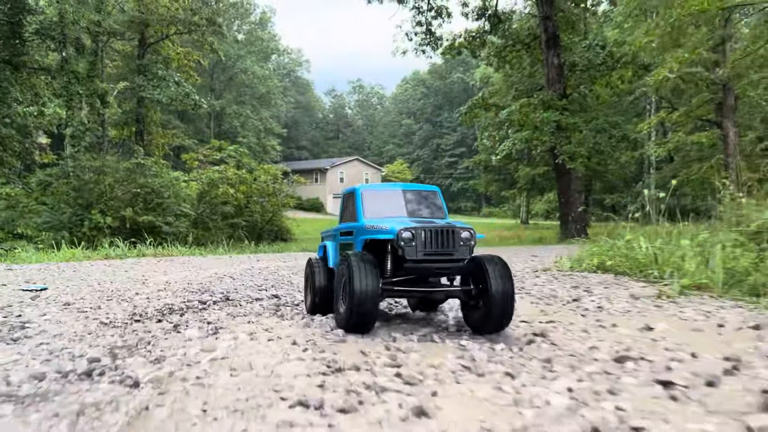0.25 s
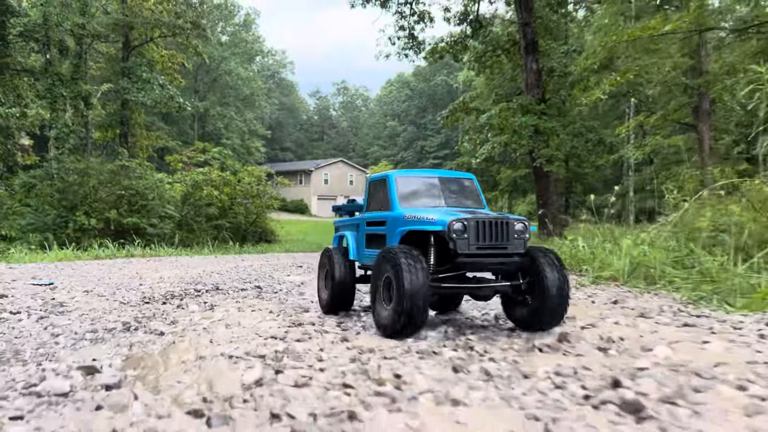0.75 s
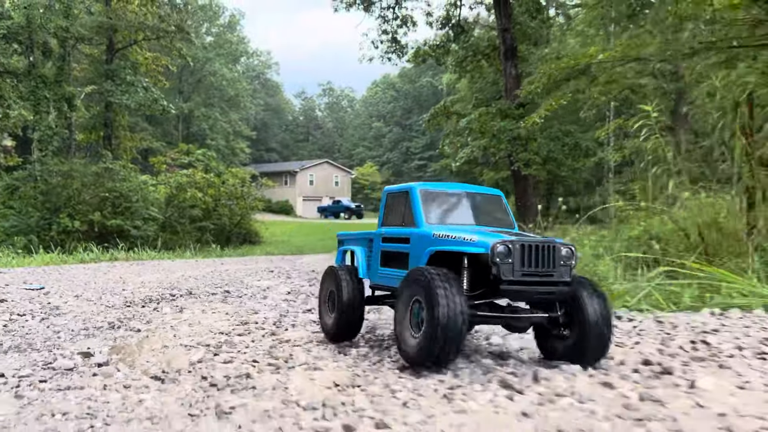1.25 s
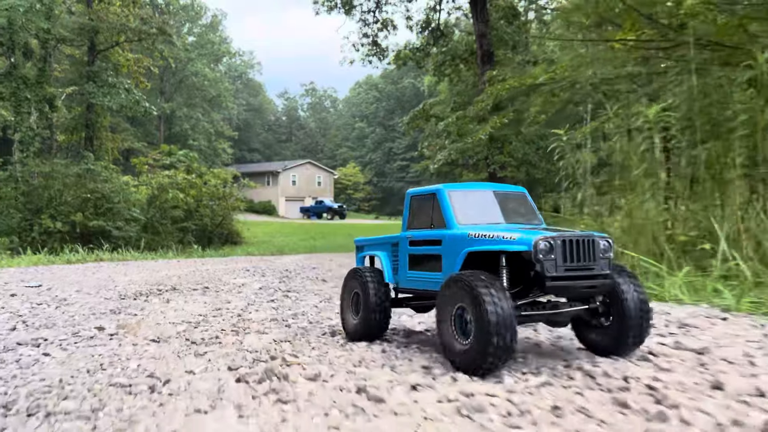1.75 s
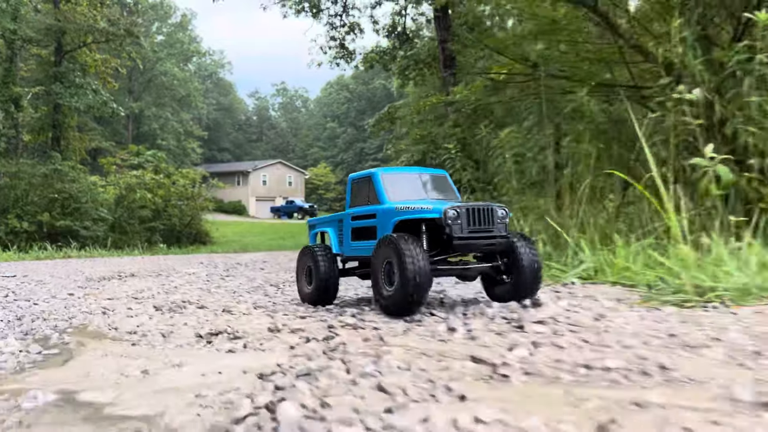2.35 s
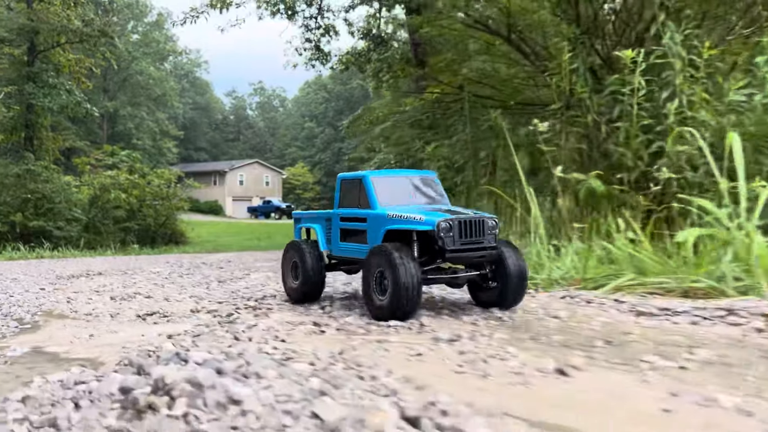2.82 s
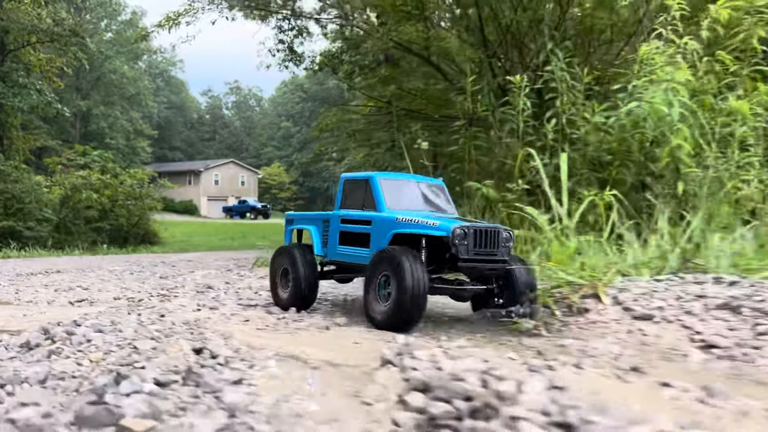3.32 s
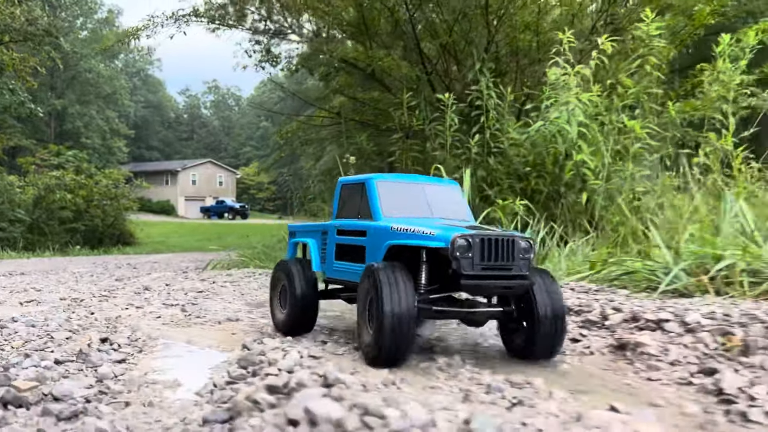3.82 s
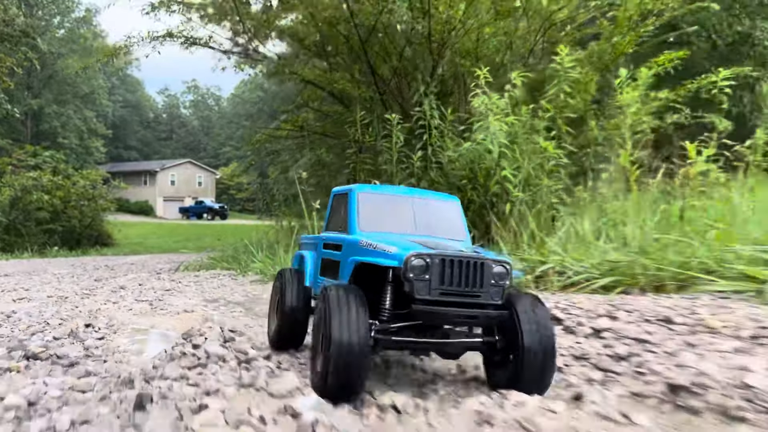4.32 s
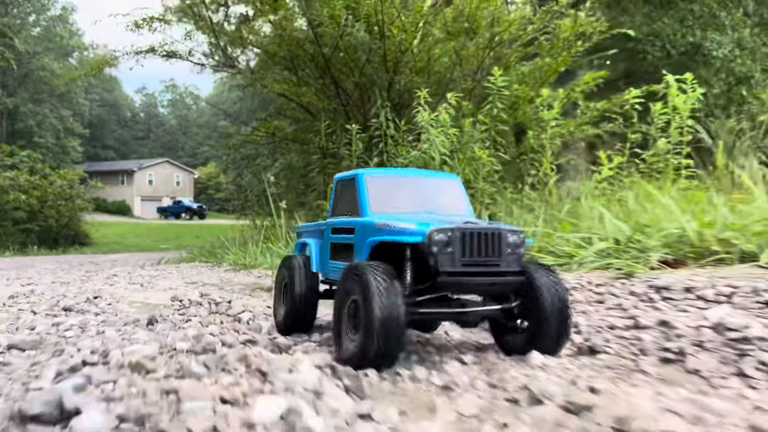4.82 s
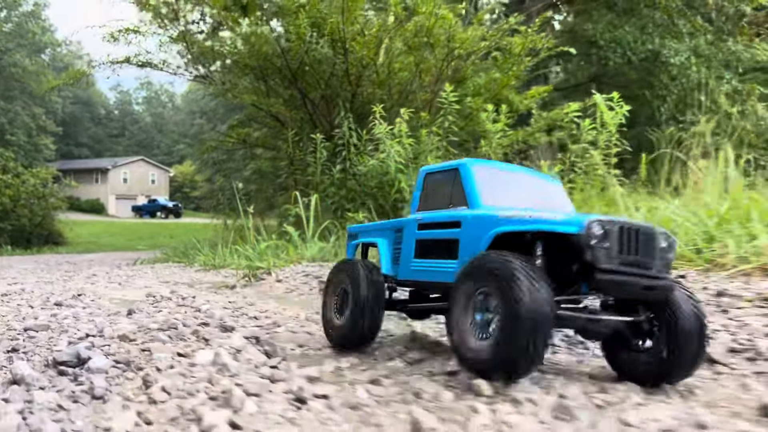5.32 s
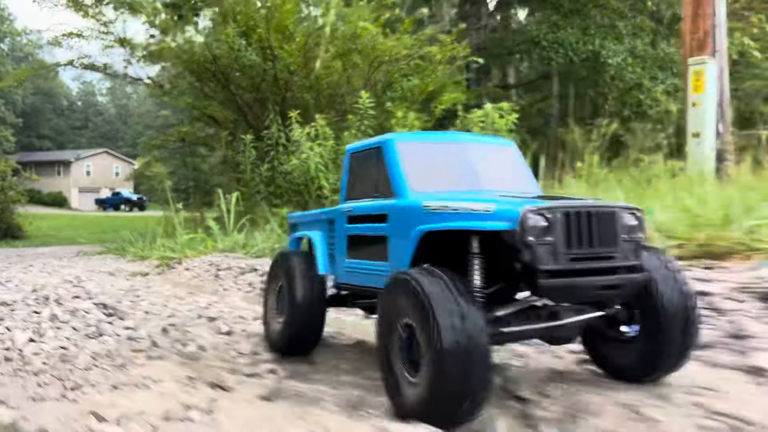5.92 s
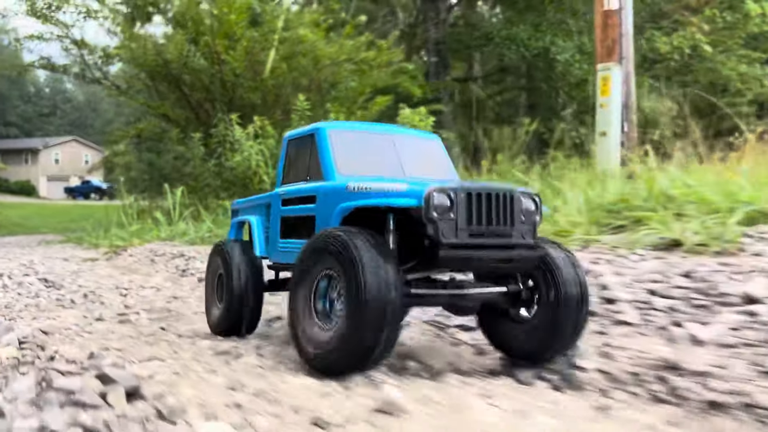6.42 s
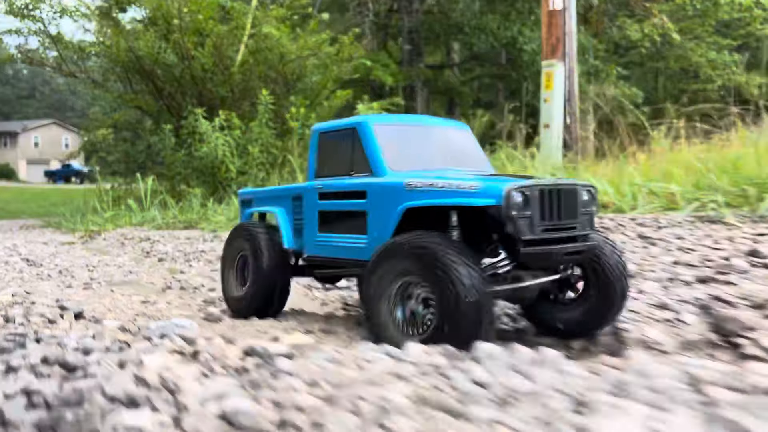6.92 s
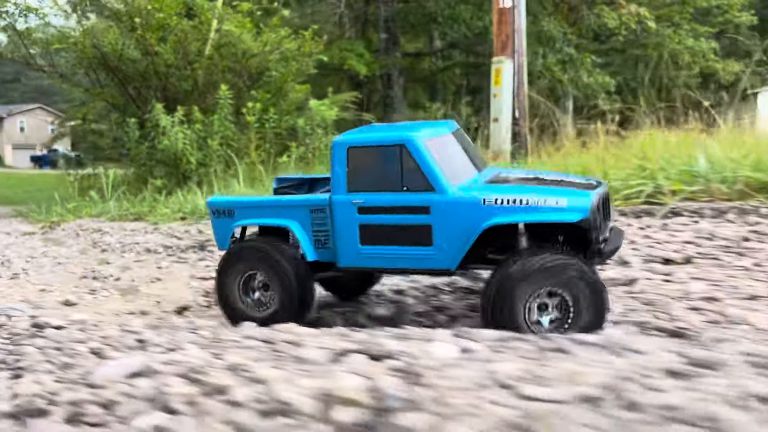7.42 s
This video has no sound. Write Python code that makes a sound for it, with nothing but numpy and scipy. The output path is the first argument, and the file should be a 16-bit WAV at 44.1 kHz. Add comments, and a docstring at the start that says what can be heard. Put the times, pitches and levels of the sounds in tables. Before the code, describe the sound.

Continuous gritty rush of gravel under small rubber tyres, with a low rough electric buzz and breathy gear hum, swelling unevenly as the toy approaches.

```python
"""Tyres of a small electric toy truck crush loose gravel outdoors: a dense rush of stone grains,
made of noise and short pulses, that grows brighter as the truck crawls nearer.
A buzz of 50 a second, summed from locked partials, runs through it; the rush throbs eight times
a buzz period. Behind: a breathy gear hum of band noise and two soft low thuds of decaying sine."""
import sys
import numpy as np
from scipy import signal
from scipy.fft import rfft, irfft, next_fast_len
from scipy.io import wavfile
from scipy.ndimage import uniform_filter1d, map_coordinates

SR = 44100
rng = np.random.default_rng(int(sys.argv[2]) if len(sys.argv) > 2 else 0)


def makeup_ratio(level_db):
    """Linear amplitude ratio for a level in decibels (20 dB per factor of ten)."""
    decades = np.asarray(level_db, float) / 20
    return 10 ** decades


def master(y):
    """Save y as 16-bit WAV."""
    cut = np.clip(np.atleast_2d(y).T, -1, 1)
    pcm = np.round(cut * 32767)  # scale
    wavfile.write(sys.argv[1], SR, pcm.astype(np.int16))


N = 337708  # samples
BUZZ_HZ, BITE_S = 50, 0.275


# evenness of deep, rumble, grind, rasp, crunch, hiss: (firmness [0-1])
EVENNESS = [.05, 0.1, 0.37, .3, 0.3, 0.31]


def rush(levels_db):
    """Crushed gravel in six frequency parts, each evened and set to its own moving level."""
    parts = zip(levels_db, layers(gravel()), EVENNESS)
    return sum(makeup_ratio(db) * evened(part, firmness) for db, part, firmness in parts)


# left-right likeness of the stones: (frequency [Hz], correlation [-1 to 1])
LIKENESS = [(60, 0.16), (150, 0.12), (500, 0.23), (2000, 0.055), (9000, 0.083)]


def gravel():
    """Throbbing grains plus buzz ticks, coloured; the two channels are mostly unrelated."""
    pair = grains(per_second=2500, share=0.4) * throb(depth_db=1.2) + buzz_ticks()

    def turn_rad(hz):
        return np.arcsin(np.clip(along(LIKENESS, hz), -1, 1)) / 2

    own = filtered(pair, lambda hz: colour(hz) * np.cos(turn_rad(hz)))
    shared = filtered(pair[::-1], lambda hz: colour(hz) * np.sin(turn_rad(hz)))
    return calmed(own + shared)


def grains(per_second, share):
    """Stones snap as short suction pulses over a noise bed of countless far ones; share is of power."""
    struck = rng.random((2, N)) < per_second / SR
    snaps = rng.uniform(0.5, 1.5, (2, N)) * struck
    bed = rng.standard_normal((2, N))
    return np.sqrt(1 - share) * bed - np.sqrt(share) * unit(snaps - snaps.mean())


# the eight throbs of one buzz period: (strength [dB])
THROB_DB = [-0.7, 0.38, 0.5, 0.92, 1.3, 1, 0.51, -0.54]


def throb(depth_db):
    """Loudness beats eight times a buzz period, each beat at its own strength."""
    count = len(THROB_DB)
    beat = np.arange(N) / SR * BUZZ_HZ * count
    strength_db = np.interp(beat % count, np.arange(count) + 0.5, THROB_DB, period=count)
    return makeup_ratio(strength_db - depth_db * np.cos(2 * np.pi * beat))


# buzz ticks: (place in the throb [0-1], push scale [amplitude, minus = pull])
BUZZ_TICKS = [(.015, -1.8), (.265, 2.0), (.36, -1.6), (.445, 2.0), (.505, -1.9), (.61, -1.8), (.69, -1.5),
              (.77, -2.8)]


def buzz_ticks():
    """Short ticks sit at fixed places in every throb of the buzz; random zero-mean force, some sharp."""
    place, push = np.transpose(BUZZ_TICKS)
    throb_s = 1 / (BUZZ_HZ * len(THROB_DB))
    starts = np.arange(int(N / SR / throb_s))[:, None]
    at = np.round((starts + place) * throb_s * SR).astype(int)
    force = np.minimum(rng.exponential(1, (2, *at.shape)), 3.5) - 0.97  # 0.97: mean of the capped draw
    train = np.zeros((2, N + 1))
    train[:, at] = push * force
    return train[:, :N]


# stone spectrum: (frequency [Hz], relative density [dB per Hz])
STONE_SPECTRUM = [(15, -49.5), (25, -29), (60, -22.5), (110, -14), (260, -4), (520, -6), (900, -0.5),
                  (1550, -2.5), (2300, -3.5), (3320, -7.5), (5530, -18.5), (6950, -31), (7800, -44),
                  (9680, -57.5), (12000, -91.5)]
# resonances of the hollow plastic shell: (frequency [Hz], width [Hz], lift [dB])
SHELL = [(50, 14, 7), (422.6, 17, 5.5), (444, 31, 2.5), (471, 16, 2.5), (608, 45, 4.5), (844, 55, 1.5),
         (1020, 26, 0.5), (1206, 59, 5), (1417, 90, 1.5), (1730, 90, 2.5), (2020, 380, 2.5), (2770, 82, 2),
         (3210, 79, 2), (4930, 200, 1.5), (5800, 75, 2.5)]
# sag at buzz multiples, equal rise halfway between: (frequency [Hz], depth [dB])
RIPPLE = [(60, 0), (200, 0.5), (500, 0.1), (1500, 1), (5000, 1)]


def colour(hz):
    """Stone spectrum, lifted where the shell rings, rippled in step with the buzz."""
    shell_db = sum(db / (1 + (2 * (hz - centre) / width) ** 2) for centre, width, db in SHELL)
    ripple_db = along(RIPPLE, hz) * np.cos(2 * np.pi * hz / BUZZ_HZ)
    return makeup_ratio(along(STONE_SPECTRUM, hz) + shell_db - ripple_db)


# levelling of narrow blotches of pitch: (frequency [Hz], firmness [0-1])
CALM = [(250, 0.2), (800, 0.4), (1500, 0.14), (4000, 0.22)]


def calmed(x):
    """Brief narrow swells and gaps are pressed towards the mean power of their frequency bin."""
    hz, _, z = signal.stft(x, SR, nperseg=512)
    power = np.abs(z) ** 2
    ratio = uniform_filter1d(power, size=3, axis=2) / power.mean(axis=2, keepdims=True)
    firmness = np.clip(along(CALM, hz), 0, 1)[:, None]
    gain = (np.abs(ratio) + 0.05) ** (-firmness / 2)
    return signal.istft(z * gain, SR, nperseg=512)[1][:, :N]


def evened(part, firmness, hold_s=0.015):
    """The crush is more even than chance: short swells are pressed down, short gaps filled."""
    span = round(hold_s * SR)
    power = np.abs(uniform_filter1d(uniform_filter1d(part ** 2, span), span))
    return unit(part * (power / power.mean() + 1e-3) ** (-np.clip(firmness, 0, 1) / 2))


# splits between deep | rumble | grind | rasp | crunch | hiss: (frequency [Hz])
SPLIT_HZ = [140, 346, 720, 1497, 3940]


def layers(x):
    """Parts from low to high, with soft edges, that add up to x."""
    lows = [filtered(x, lambda f: 1 / (1 + (f / hz) ** 6.0)) for hz in SPLIT_HZ]
    return np.diff([0 * x] + lows + [x], axis=0)


# The next three have one row per part, deep to hiss.
# (base level [dB], per nearness [dB/dB], per load [dB/dB], per surge [dB/dB])
PARTS = [(-59, -0.3, 2, 0), (-50, -0.2, 2.2, 1.3), (-43.5, 0.26, 0.94, 0.36), (-40.5, 0.29, 0.5, 0.54),
         (-40.5, 0.64, -0.06, 0.72), (-45.5, 1.13, -1, 0.5)]
# change before the tyres bite: (level [dB])
THIN_DB = [-11.5, -12, -5.5, -4, -0.5, 1.5]
# shaking as the wheels bump: (level per unit of jolt [dB])
JOLT_DB = [.1, .1, .1, 0.32, 0.67, 0.71]


def part_levels_db(near_db, load_db, thin):
    """Nearness, load and surges set each part; all shake together; balance jumps at the bite."""
    jolt = np.minimum(wobble(rate=30), 0.54)  # dips freely, swells only this far
    driven_db = np.array(PARTS) @ [np.ones(N), near_db, load_db, surges()]
    return driven_db + np.outer(THIN_DB, thin) + np.outer(JOLT_DB, jolt)


# drive controls: (time [s], nearness [dB], tyre load [dB])
DRIVE = [(0, -6, 0), (.28, -7.5, 0), (.55, -8, -2), (.85, -5, -.5), (1.2, -2, 0), (1.71, -3, 0.2),
         (1.76, -6, -2), (1.98, -4, -1.5), (2.1, -2, .5), (2.7, -0.5, 0.5), (3.0, -0.6, -0.5),
         (3.3, -.5, -.5), (3.55, .6, 0.5), (3.76, 0, 0), (4.0, 2, 1), (4.28, 0.5, -1.5), (4.55, 1.8, 0),
         (4.9, 1.5, 0.5), (5.33, 2, -1.5), (5.7, 3.5, 0), (6.3, 4, 0), (6.9, 3, -1.5), (7.3, 3.5, -1),
         (7.66, 5.5, -1.5)]


def drive():
    """Nearness and tyre load per sample, in straight lines between points."""
    s, *columns = np.transpose(DRIVE)
    return [np.interp(np.arange(N) / SR, s, column) for column in columns]


# a wheel rolls onto a loose heap: (time [s], surge [dB])
SURGES = [(.32, -1), (.62, -0.5), (.9, 1.5), (1.14, 2), (1.3, 0.7), (1.68, 1), (2.4, 1.5), (2.72, 4.5),
          (3.38, 1.5), (4.05, 2.5), (5.03, 3.5), (5.75, 0.5), (6.12, 1), (6.75, 2.5), (7.1, 1), (7.58, 2)]


def surges(rise_s=0.02, fall_s=0.068):
    """Each heap swells (if negative, dips) the rush quickly and lets it return more slowly (dB)."""
    s, db = np.transpose(SURGES)
    since = np.arange(N) / SR - s[:, None]
    return db @ np.exp(np.where(since < 0, since / rise_s, -since / fall_s))


# buzz level per rush level, deep to hiss: (slope [dB/dB])
BUZZ_FOLLOWS = [.3, .55, 0.7, 0.93, 0.82, 0.34]


def following_buzz(levels_db, near_db, load_db, thin):
    """The buzz swells in part with the rush, frequency part by part."""
    parts = zip(levels_db, BUZZ_FOLLOWS, layers(buzz(near_db, load_db, thin)))
    return sum(makeup_ratio(follow * (db - db.mean())) * part for db, follow, part in parts)


# strongest partials: (multiple of buzz rate [1], base level [dB rms])
STRONG_PARTIALS = [(1, -66.0), (2, -70.5), (3, -65.5), (4, -62.5), (5, -63.5), (6, -59.5), (7, -61.0),
                   (8, -52.0), (9, -60.0), (15, -55.5), (32, -59.5), (39, -58.5), (40, -58.5), (108, -70.5),
                   (110, -70.5), (120, -74.0), (128, -77.0), (136, -76.5), (138, -82.5), (141, -85.0),
                   (144, -80.0), (152, -91.5), (159, -95.5), (161, -96.5), (168, -98.5), (176, -95.0),
                   (184, -99.5), (10, -60.5), (11, -61), (14, -57), (17, -60), (18, -61), (19, -58),
                   (16, -59.5), (22, -57.5), (28, -60), (68, -64), (92, -69)]
# drifting partials: (multiple [1], per nearness [dB/dB], per load [dB/dB], wavering [dB])
DRIFTS = [(1, -0.35, .6, 1), (2, 0.5, 0.5, 0.5), (3, -0.6, -1, 2), (4, .7, 0, 2), (8, 0, -.1, 0.9),
          (14, 0, -0.5, 1.5), (15, 1, 0, 2)]


def buzz(near_db, load_db, thin):
    """Partials locked to whole multiples of 50 Hz: some strong, a faint uneven comb between."""
    order = np.arange(1, 190)
    draw = rng.random((len(order), 3))
    comb_db = -56.0 + along(STONE_SPECTRUM, order * BUZZ_HZ) + 5.1 * np.log(draw[:, 0] + 0.017)
    level = makeup_ratio(comb_db)
    strong, strong_db = np.transpose(STRONG_PARTIALS)
    level[strong.astype(int) - 1] = makeup_ratio(strong_db)
    side = makeup_ratio(2.3 * (draw[:, 1] - 0.5) * [[1], [-1]])
    cycle = np.arange(round(SR / BUZZ_HZ)) * BUZZ_HZ / SR
    sines = np.sin(2 * np.pi * (order[:, None] * cycle + draw[:, 2:]))
    waves = (level * side)[..., None] * np.sqrt(2) * sines

    def repeat(period):
        return np.take(period, np.arange(N), axis=1, mode="wrap")

    multiple, per_near, per_load, waver_db = np.transpose(DRIFTS)
    rows = np.round(multiple).astype(int) - 1
    drift_db = np.outer(per_near, near_db - near_db.mean())
    drift_db += np.outer(per_load, load_db - load_db.mean())
    drift_db += [db * wobble(rate=5.1) for db in waver_db]
    drift_db[0] += -11 * thin  # lowest partial is weaker before the bite
    others = np.delete(waves, rows, axis=1).sum(axis=1)
    drifting = sum(makeup_ratio(db) * repeat(waves[:, row]) for row, db in zip(rows, drift_db))
    return repeat(others) + drifting


def gears(crunch_db, centre_hz=680, width_hz=110):
    """Breathy gear hum: noise through one resonance, rising with the crunch as the truck nears."""
    noise = rng.standard_normal((2, N))
    hum = filtered(noise, lambda hz: 1 / (1 + (2 * (hz - centre_hz) / width_hz) ** 2))
    return makeup_ratio(-47.5 + 1.26 * (crunch_db - crunch_db.mean())) * unit(hum)


# soft low thuds: (time [s], envelope peak [dB])
THUDS = [(1.27, -59), (1.42, -54)]


def thuds(pitch_hz=46, rise_s=0.04):
    """Each thud is a few low sine cycles that swell and die."""
    s, db = np.transpose(THUDS)
    since = np.maximum(np.arange(N) / SR - s[:, None], 0)
    swell = since / rise_s * np.exp(1 - since / rise_s)
    return makeup_ratio(db) @ (swell * np.sin(2 * np.pi * pitch_hz * since))


def unit(x):
    """Scaled to rms 1."""
    return x / np.sqrt(np.mean(x ** 2) + 1e-20)


def along(points, hz):
    """(Hz, value) points read on a log axis."""
    f, v = np.transpose(points)
    return np.interp(np.log(hz + 1), np.log(f + 1), v)


def filtered(x, response):
    """x times a response of frequency."""
    m = next_fast_len(N + 8192)
    return irfft(rfft(x, m) * response(np.fft.rfftfreq(m, 1 / SR)), m)[..., :N]


def wobble(rate):
    """A smooth random curve, rate knots a second."""
    knots = rng.standard_normal(int(N * rate / SR) + 4)
    return map_coordinates(knots, [np.arange(N) * rate / SR])


def scene():
    """Rush, buzz, gears and thuds; lighter load leans left, the start leans right."""
    near_db, load_db = drive()
    thin = np.arange(N) < BITE_S * SR  # true until the tyres bite
    levels_db = part_levels_db(near_db, load_db, thin)
    mix = rush(levels_db) + following_buzz(levels_db, near_db, load_db, thin)
    mix = mix + gears(crunch_db=levels_db[4]) + thuds()
    lean_db = 0.23 - 0.3 * load_db - 2.5 * thin  # left minus right
    return mix * makeup_ratio(lean_db / 2 * [[1], [-1]])


def low_pass(x):
    """Removes everything above the highest recorded frequency."""
    return signal.sosfilt(signal.butter(12, 9830, fs=SR, output="sos"), x)


# channel colour: (frequency [Hz], left minus right [dB])
BALANCE_DB = [(60, -4.5), (210, -2), (740, -0.5), (2620, 1), (9230, -2.5)]


def record(dry):
    """The two channels differ a little in colour and share a small constant offset."""
    channels = filtered(dry, lambda hz: makeup_ratio(along(BALANCE_DB, hz) / 2 * [[1], [-1]]))
    return low_pass(channels + 0.0011)


dry = scene()
out = record(dry)
master(out)
```